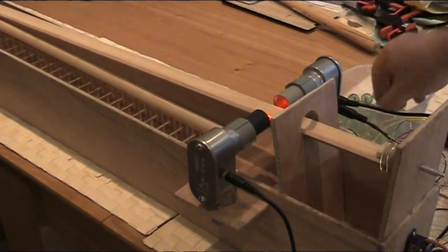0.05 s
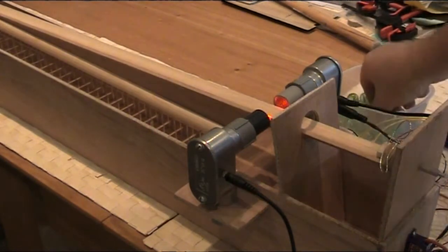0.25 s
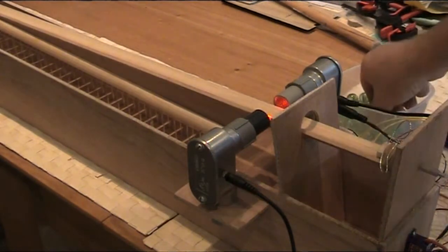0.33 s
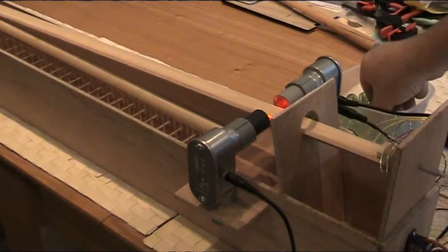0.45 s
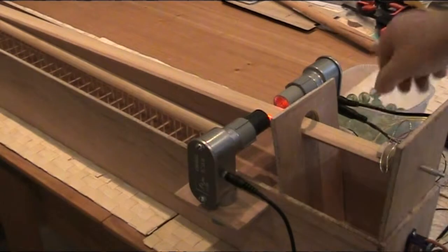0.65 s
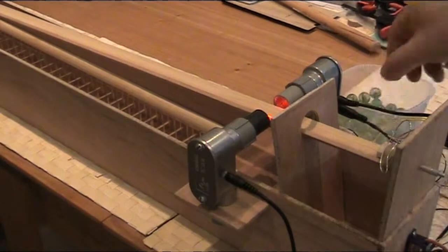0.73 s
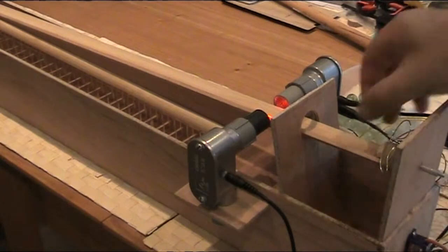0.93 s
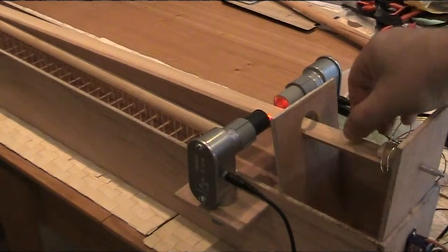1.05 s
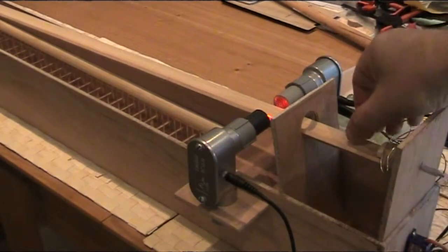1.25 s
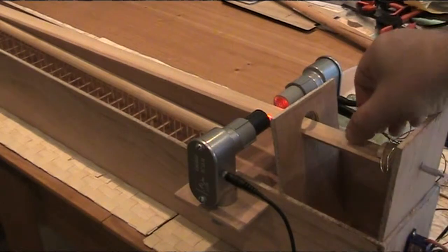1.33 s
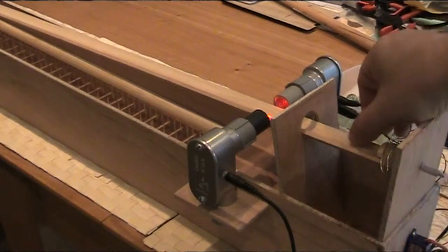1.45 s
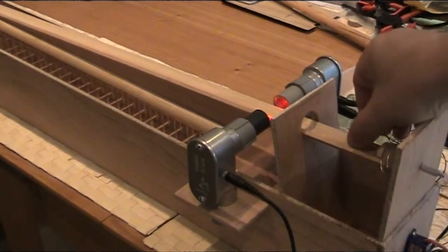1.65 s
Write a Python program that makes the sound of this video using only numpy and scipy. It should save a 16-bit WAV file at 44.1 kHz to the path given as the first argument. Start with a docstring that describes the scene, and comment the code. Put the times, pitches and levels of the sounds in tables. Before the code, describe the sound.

Glass marbles click and knock as a hand picks them from a plastic tub. They clink in the hand, then one lands on a wooden trough with dull knocks. Equipment buzzes faintly in the small room.

```python
"""Mains-powered gear hums and buzzes faintly in a small room, which rings after each hit.
From 0.2 s a hand picks glass marbles out of a plastic tub: they rub and click together,
and two drop back against the tub and make it ring. Around 0.8 s the marbles clink in the hand.
From 1.1 s one is set down on a wooden trough with two dull knocks, and then the buzz gets quieter."""
import sys
import numpy as np
from scipy import signal
from scipy.fft import rfft, irfft
from scipy.io import wavfile
from scipy.ndimage import uniform_filter1d

SR = 44100
rng = np.random.default_rng(int(sys.argv[2]) if len(sys.argv) > 2 else 0)


def generate_wav(sig):
    """Save sig (samples, or channels by samples) to the path in sys.argv[1] as 16-bit PCM at SR."""
    pcm = np.round(np.clip(np.atleast_2d(sig).T, -1, 1) * 32767).astype(np.int16)
    wavfile.write(sys.argv[1], SR, pcm)


N = 74970
CLICK_T60 = 0.017  # a t60 is a fade time: the seconds a sound takes to drop by 60 dB


def amp(db):
    """Turns decibels into a number to multiply by."""
    return 10 ** (np.asarray(db) / 20)

def read(points, hz):
    """Looks up a pitch in a table, gliding between its rows."""
    pitches, values = np.transpose(points)
    return np.interp(np.log(hz + 1), np.log(pitches + 1), values)

def unit(x):
    """Scales a sound to an average energy of 1 per channel."""
    return x / np.sqrt(np.sum(x ** 2, -1).mean() + 1e-20)

def add(mix, s, sound):
    """Mixes a sound in, starting at s seconds."""
    part = mix[:, max(round(s * SR), 0):][:, :sound.shape[-1]]
    part += sound[..., :part.shape[1]]

def lean_right(x, db):
    """Turns the left side down and the right side up."""
    return x * amp([[-db], [db]])

def pair(alike, size):
    """Hiss for two ears: likeness 1 is the same in both, 0 unrelated, -1 opposite."""
    a, b = rfft(rng.standard_normal((2, size)))
    likeness = np.clip(read(alike, np.fft.rfftfreq(size, 1 / SR)), -1, 1)
    mid, side = a * np.sqrt((1 + likeness) / 2), b * np.sqrt((1 - likeness) / 2)
    return irfft(np.array([mid + side, mid - side]), size)

def noise(colour, alike):
    """Steady noise; its colour says how strong each pitch is."""
    shape = amp(read(colour, np.fft.rfftfreq(N, 1 / SR)))
    return unit(irfft(rfft(pair(alike, N)) * shape, N)) * np.sqrt(N)

def burst(colour, t60, alike, size=4096):
    """A blow shakes out many notes at once, which blur into a short, fading noise."""
    spectrum = np.fft.fft(pair(alike, size) * amp(-60 * np.arange(size) / SR / t60))
    power = uniform_filter1d((abs(spectrum) ** 2).mean(0), int(size / SR / t60 * 10) + 1, mode="wrap")
    gain = amp(read(colour, abs(np.fft.fftfreq(size, 1 / SR)))) / np.sqrt(power + 1e-12)
    shape = np.exp(np.conj(signal.hilbert(np.log(gain))))  # keeps the start sudden
    return unit(np.fft.ifft(spectrum * shape).real)

def tick(colour, t60):
    """A hard tap, heard directly and so nearly alike in both ears."""
    return burst(colour, t60, [(1, 0.88)])

def ring(hz, t60, db):
    """A struck object rings with its own notes, each fading at its own speed."""
    t = np.arange(SR // 2) / SR
    phase = rng.random((len(hz), 1))
    fades = amp(db[:, None] - 60 * t / t60[:, None])
    return unit((fades * np.sin(2 * np.pi * (hz[:, None] * t + phase))).sum(0))

def ping(hz, t60):
    """One quickly dying note."""
    t = np.arange(2048) / SR
    return unit(amp(-60 * t / t60) * np.sin(2 * np.pi * hz * t))

# how long the room rings (pitch [Hz], fade time [s])
ROOM_FADE = [(150, 1), (500, 0.46), (1300, 0.54), (3700, 0.49), (9000, 0.42)]
# how alike sound in the room is at the two ears (pitch [Hz], likeness [0 to 1])
ROOM_LIKENESS = [(60, 0.32), (250, 1), (600, 0.99), (1300, 0.96), (2500, 0.82), (5000, 0.59), (9000, 0.12),
                 (15000, 0.11)]

def room(x, wet_db):
    """Adds quick echoes from the bench and the room's longer ring; wet_db sets their level."""
    size = SR * 3 // 4
    t = np.arange(size) / SR
    hz, times, spectrum = signal.stft(pair(ROOM_LIKENESS, size), SR, nperseg=256)
    fades = amp(-60 * times / read(ROOM_FADE, hz)[:, None])
    tail = signal.istft(spectrum * fades, SR, nperseg=256)[1][:, :size]
    early = pair(ROOM_LIKENESS, size) * amp(-60 * t / 0.16)
    onset = np.clip(t / 0.0021 - .5, 0, 1)
    echo = unit(tail * onset) + amp(-4) * unit(early * onset)
    echo = signal.lfilter(*signal.butter(1, 14200, fs=SR), echo)  # the walls soak up the top treble
    return x + amp(wet_db) * signal.fftconvolve(x, echo, axes=1)[:, :N]

# colour of the background noise (pitch [Hz], level [dB])
AIR_COLOUR = [(20, -22), (60, -1.5), (150, -0.5), (300, -1), (700, -6.5), (1000, -4.5), (1500, -10.5),
              (3200, -15.5), (5500, -12), (9000, -23), (14000, -26.5), (16000, -52)]
# how alike it is at the two ears (pitch [Hz], likeness [-1 to 1])
AIR_LIKENESS = [(30, -0.4), (100, -0.63), (500, -0.52), (2000, -0.072), (8000, 0.12)]

def air():
    """The faint, steady hush of the room."""
    return amp(-53.5) * noise(AIR_COLOUR, AIR_LIKENESS)

# a low hum and two thin whines (pitch [Hz], level [dB])
HUM_NOTES = [(100.2, -65), (3155, -70), (5507, -71)]
# strength of the buzz (time [s], level [dB])
BUZZ_STRENGTH = [(0, -27), (1.0, -26), (1.32, -29.5), (1.42, -35), (1.7, -34.5)]
# colour of one tick of the buzz (pitch [Hz], level [dB])
BUZZ_COLOUR = [(200, -24), (1500, -11), (2600, 1.5), (3200, 8.5), (4700, -4.5), (5500, -4), (8000, -12),
               (15000, -39)]

def mains():
    """The gear hums and rattles once in every mains cycle; the ticks blur into a buzz."""
    cycle_s, tick_t60, fade_db_per_s = 0.01998, 0.015, 6.5
    ticks = np.zeros((2, N))
    same = tick(BUZZ_COLOUR, tick_t60)
    for s in np.arange(N / SR // cycle_s) * cycle_s + 0.001179:
        db = np.interp(s, *np.transpose(BUZZ_STRENGTH)) + 2.5 * rng.standard_normal()
        add(ticks, s, amp(db) * unit(same + 0.6 * tick(BUZZ_COLOUR, tick_t60)))
        note_db = db - 2.5 - fade_db_per_s * s  # a lower note in the rattle fades away
        add(ticks, s, amp(note_db) * ping(hz=2210, t60=0.014))
    t = np.arange(N) / SR
    hum = sum(amp(db) * np.sqrt(2) * np.sin(2 * np.pi * hz * t) for hz, db in HUM_NOTES)
    return room(ticks, wet_db=-1.5) + hum

# the hand's movements (middle time [s], length [s], level [dB])
RUB_SWELLS = [(0.168, 0.023, -68), (0.254, 0.13, -42), (0.912, 0.67, -51.5), (1.503, 0.11, -58.5)]
# colour of the rubbing (pitch [Hz], level [dB])
RUB_COLOUR = [(60, -34), (400, 9), (1200, 7.5), (2200, 11.5), (4000, -8.5), (8000, -23), (15000, -45)]

def rubbing():
    """Fingers and marbles slide over each other in soft swells."""
    t = np.arange(N) / SR
    swell = sum(amp(db) * np.exp(-(2 * (t - s) / length) ** 2) for s, length, db in RUB_SWELLS)
    return swell * noise(RUB_COLOUR, ROOM_LIKENESS)

# a marble meets the trough (time [s], click level [dB], thud level [dB])
TROUGH_HITS = [(1.0897, -35, -11), (1.0929, -20, -3), (1.098, -33, -3.5), (1.104, -10.5, -22),
               (1.1095, -22, -11), (1.179, -26.5, -23), (1.2635, -40.5, -14.5), (1.2685, -46, -15),
               (1.414, -28.5, -52)]
# colour of glass touching wood (pitch [Hz], level [dB])
TROUGH_CLICK = [(200, -16), (1500, -1), (3900, 5), (5200, -5), (6700, 1), (9000, -24), (15000, -32)]
# colour of the wood's thud (pitch [Hz], level [dB])
TROUGH_THUD = [(100, -20.5), (190, -10.5), (290, -10), (480, -7), (660, 2.5), (850, 1.5), (1100, 2),
               (1350, -0.5), (1600, -6.5), (2500, -18), (6000, -28), (16000, -87)]
# the trough's own notes (pitch [Hz], fade time [s], level [dB])
TROUGH_NOTES = [(184.9, 0.58, -14.5), (651, 0.44, -7), (750, 0.3, -15), (855, 0.35, -22), (946, 0.3, -2.5),
                (1100, .2, -6), (1295, 0.19, -1)]

def trough_knocks():
    """A marble is set down: the glass clicks, and the wood thuds and rings on."""
    knocks, notes = np.zeros((2, 2, N))
    for s, click_db, thud_db in TROUGH_HITS:
        add(knocks, s, amp(click_db) * tick(TROUGH_CLICK, CLICK_T60))
        add(knocks, s, amp(thud_db) * burst(TROUGH_THUD, WOOD_T60_S, ROOM_LIKENESS))
        add(notes, s, amp(thud_db - 5.5) * ring(*np.transpose(TROUGH_NOTES)))
    return room(knocks, wet_db=-5) + notes

# marbles meet (time [s], level [dB], ping pitch [Hz], ping level next to the click [dB])
GLASS_HITS = [(0.2044, -20.5, 1720, 2), (0.218, -16, 3680, -3), (0.2196, -8, 3480, -3),
              (0.248, -17, 4170, -15), (0.2539, -11, 4380, 3), (.3326, -12, 8260, -12),
              (0.7926, -13, 8700, -21), (0.8837, -11, 4560, -7.5), (0.8993, -18, 7300, -7.5),
              (0.9194, -14.5, 7530, -9), (1.0916, -20, 8500, -8.5)]
# colour of their click (pitch [Hz], level [dB])
GLASS_CLICK = [(100, -26.5), (400, -3.5), (1200, 0.5), (2200, -3), (5000, -3.5), (7800, -0.5), (9500, -4.5),
               (11000, -15.5), (16000, -29)]

def marble_clinks():
    """Glass hits glass with a click and a brief ping of noise around one pitch."""
    clinks = np.zeros((2, N))
    pitches, half_width_octaves = np.geomspace(100, SR / 2, 200), 0.079
    for s, db, ping_hz, ping_db in GLASS_HITS:
        distance = np.log2(pitches / ping_hz) / half_width_octaves
        ping_colour = np.column_stack([pitches, -20 * np.log10(1 + distance ** 2)])
        add(clinks, s, amp(db) * tick(GLASS_CLICK, t60=0.009))
        add(clinks, s, amp(db + ping_db) * tick(ping_colour, t60=0.0092))
    return lean_right(room(clinks, wet_db=-1), db=0.14)

# marbles hit the tub (time [s], click level [dB], thud level [dB], spot [0 wall to 1 floor])
TUB_HITS = [(0.2191, -17, -14.5, 1), (0.2434, -7.5, -10.5, 0.25), (0.2531, -8.5, -17, 0.52),
            (0.294, -16.5, -12.5, 0.24), (0.3312, -22, -10, 0), (.350, 1, 3.5, 0), (0.3578, -20, -1, 0.41),
            (0.3688, -14.5, -6.5, 0), (0.379, -15.5, -3, 0.05), (0.431, -29, -8.5, 0.2),
            (0.5773, 1.5, 0, 0.23), (0.5844, -15, 4.5, 0.67), (0.6086, -8, 1, 0.97), (.620, -17, 1.5, 0.47),
            (.632, -7, -7, 0.98), (.6485, -10.5, -5.5, 0.52), (0.6578, -28, -0.5, 1)]
# colour of glass touching plastic (pitch [Hz], level [dB])
TUB_CLICK = [(100, -32), (400, -10.5), (1500, -5.5), (2400, -2.5), (3200, 4), (4300, -0.5), (5300, -5.5),
             (7300, -4.5), (10000, -16.5), (13000, -20.5), (16000, -36)]
# colour of the tub's thud (pitch [Hz], wall hit level [dB], floor hit level [dB])
TUB_THUD = [(80, -31.5, -66), (268, -30.5, -26), (535, -7, -17), (670, -11, -1), (825, -7, 2.5),
            (1117, 7.5, 9), (1233, -6.5, 6.5), (1600, -9.5, -8.5), (1877, 2.5, -13.5), (2415, -22, -1),
            (2860, -4, -26), (3530, -18.5, -13), (5950, -28, -37), (16000, -51, -58)]
# the tub's own notes (pitch [Hz], fade time [s], wall hit level [dB], floor hit level [dB])
TUB_NOTES = [(873, 0.48, -20, -2), (976, 0.3, -7, 2), (1030, 0.28, -9, -9), (1073, 0.25, -5, -2),
             (1150, 0.84, -9, -11), (1130, 0.24, -2, -3), (1217, 0.16, -22, -4), (1288, 0.56, -26, -11),
             (1337, 0.7, -24, 9), (1807, 0.22, 0, -24), (1870, 0.33, -3, -24), (1980, 0.47, -4, -17)]

def tub_knocks():
    """Falling marbles click on the tub; its thud and ring depend on the spot they strike."""
    clicks, thuds, notes = np.zeros((3, 2, N))
    pitches, fade_times, wall_db, floor_db = np.transpose(TUB_NOTES)
    for s, click_db, thud_db, spot in TUB_HITS:
        # quieter clicks are a touch brighter
        click_colour = [(hz, db - 0.05 * click_db * (hz / 13200) ** 2) for hz, db in TUB_CLICK]
        thud_colour = [(hz, wall + spot * (floor - wall)) for hz, wall, floor in TUB_THUD]
        note_db = wall_db + spot * (floor_db - wall_db)
        add(clicks, s, amp(click_db) * tick(click_colour, CLICK_T60))
        add(thuds, s, amp(thud_db) * burst(thud_colour, t60=0.045, alike=ROOM_LIKENESS))
        add(notes, s, amp(thud_db - 9) * ring(pitches, fade_times, note_db))
    return lean_right(room(clicks, wet_db=-1), db=0.14) + room(thuds, wet_db=-2.5) + notes

def scene():
    """The hand and the marbles over the quiet room."""
    return air() + mains() + rubbing() + trough_knocks() + marble_clinks() + tub_knocks()

def record(dry):
    """Leans the sound slightly to the right and cuts the treble above 16200 Hz."""
    treble_cut = signal.firwin(511, 16200, window=("kaiser", 9), fs=SR)
    return signal.oaconvolve(lean_right(dry, db=0.5), treble_cut[None], "same")


WOOD_T60_S = 0.038

dry = scene()
out = record(dry)
generate_wav(out)
```